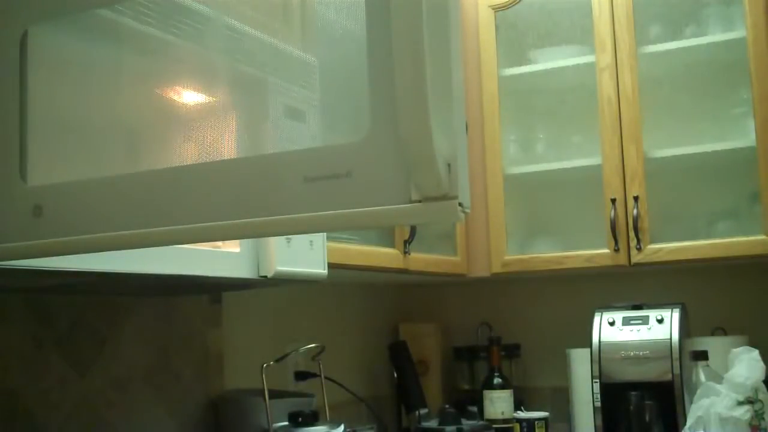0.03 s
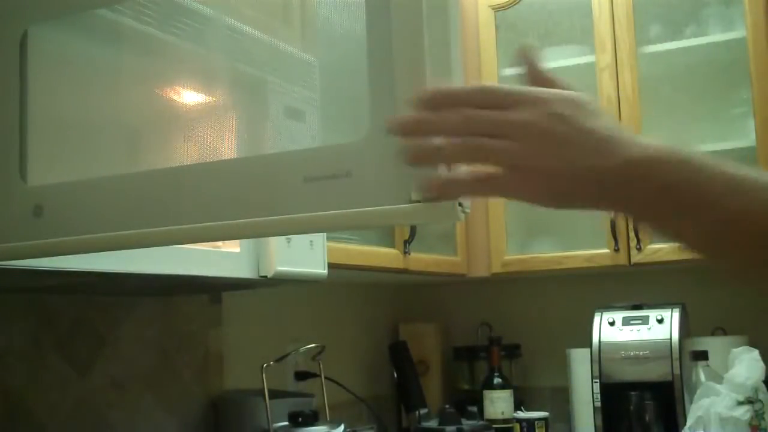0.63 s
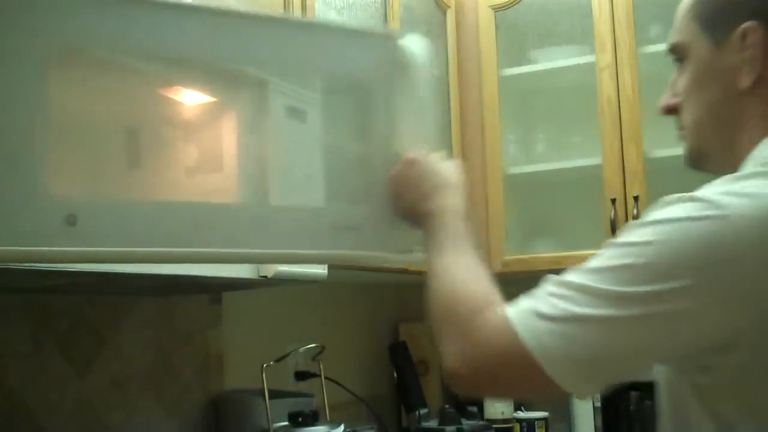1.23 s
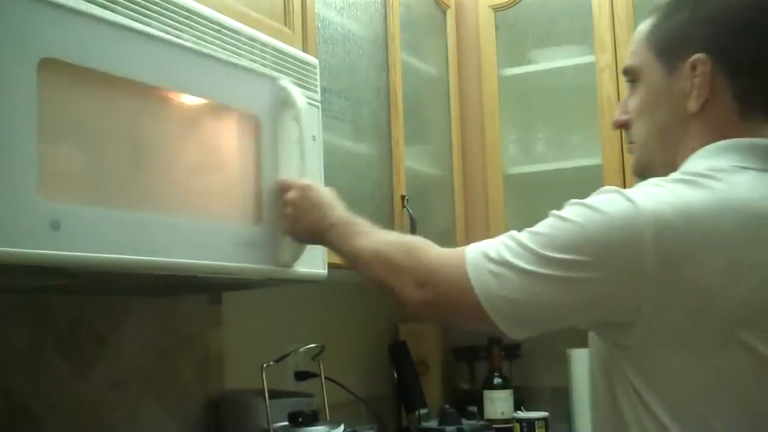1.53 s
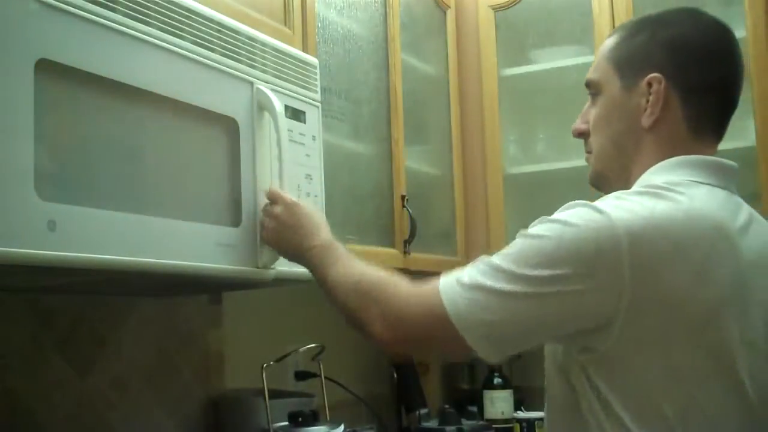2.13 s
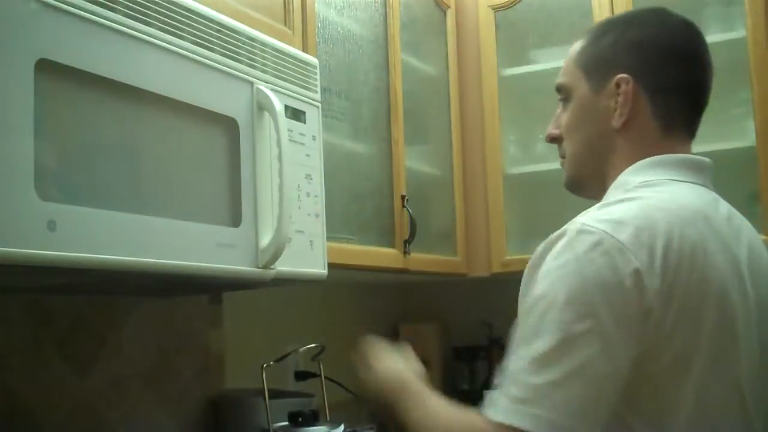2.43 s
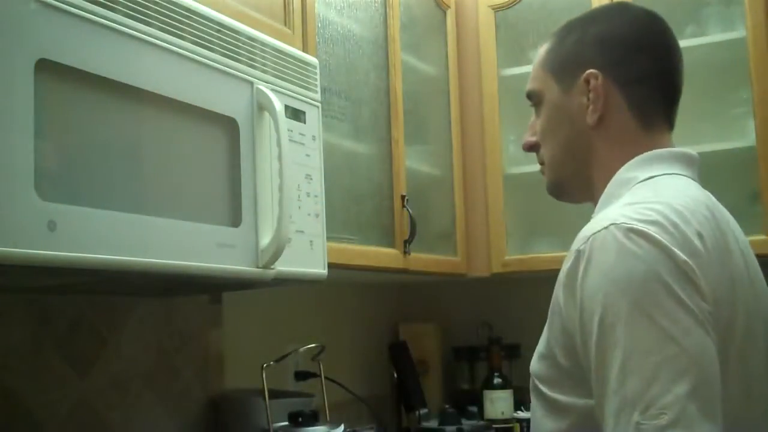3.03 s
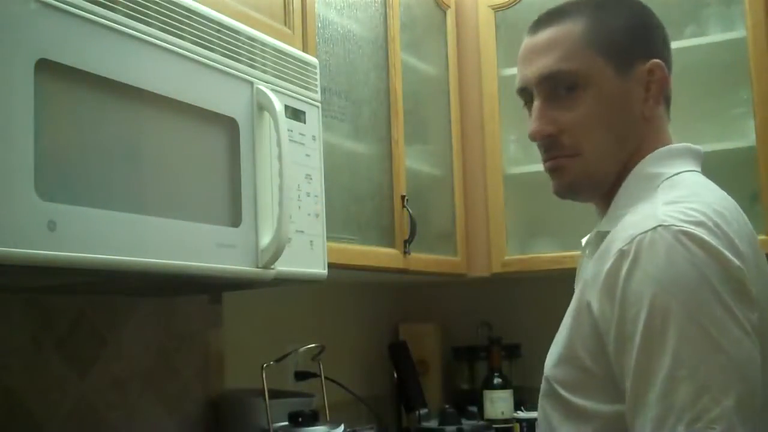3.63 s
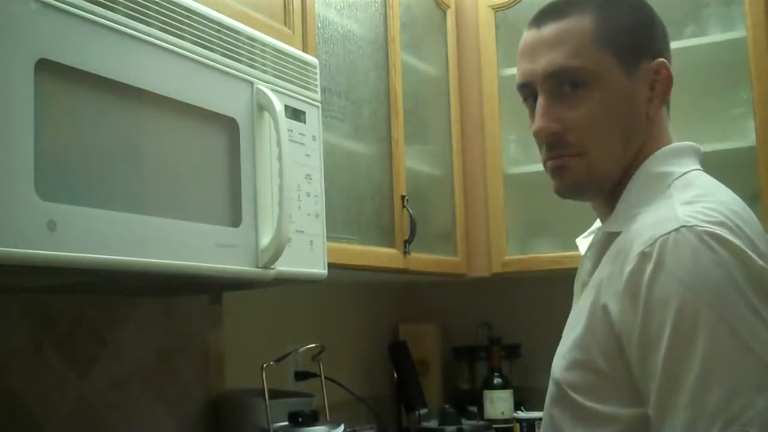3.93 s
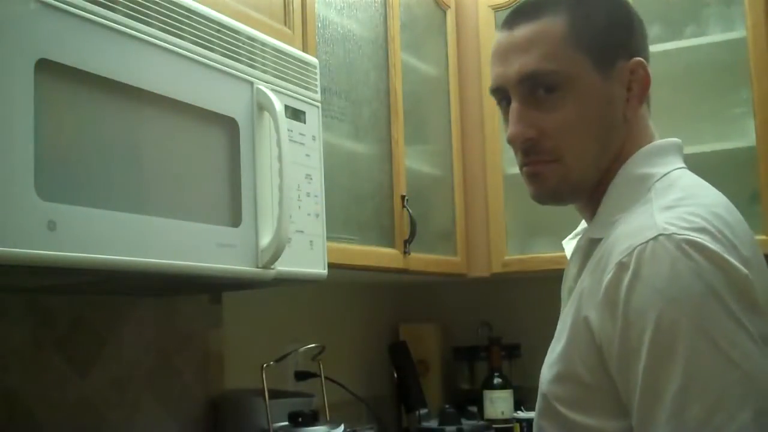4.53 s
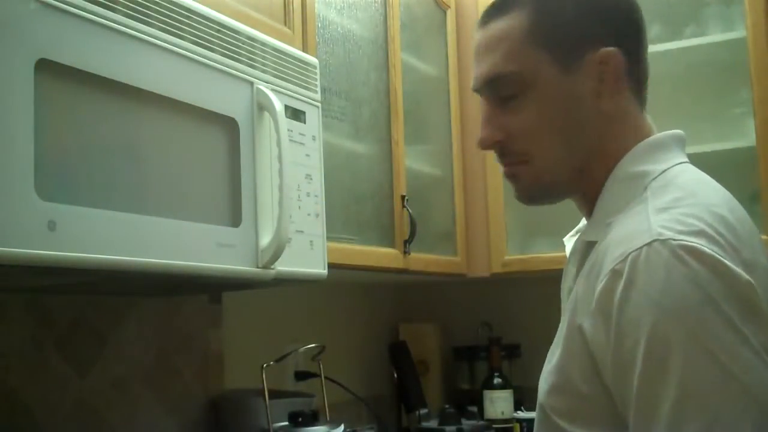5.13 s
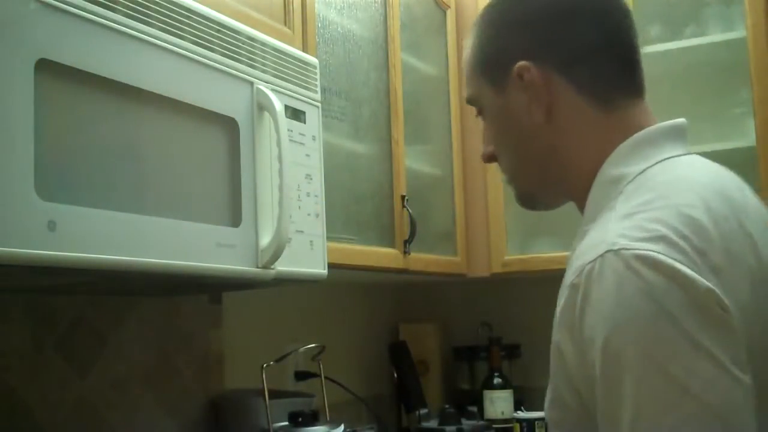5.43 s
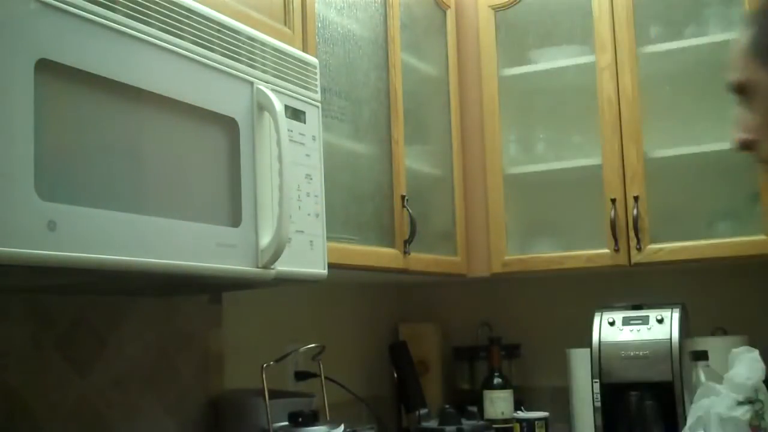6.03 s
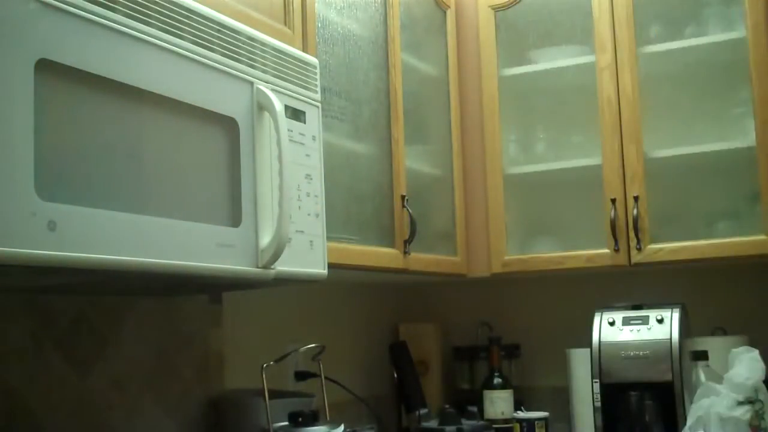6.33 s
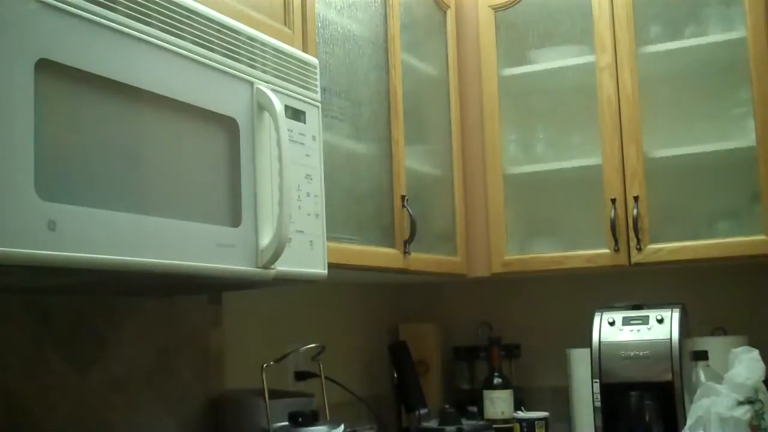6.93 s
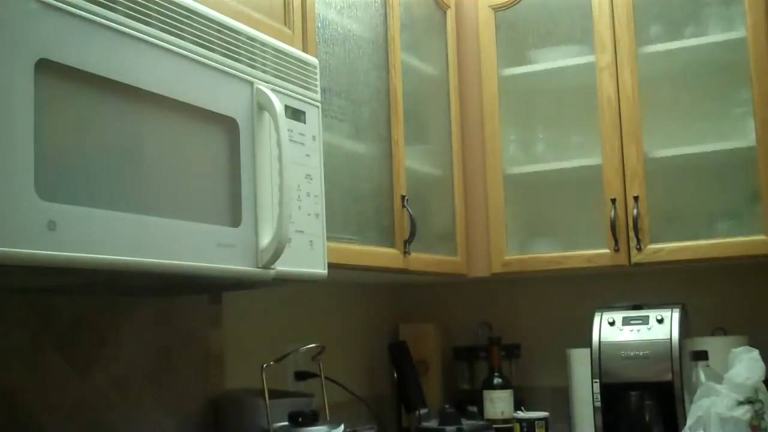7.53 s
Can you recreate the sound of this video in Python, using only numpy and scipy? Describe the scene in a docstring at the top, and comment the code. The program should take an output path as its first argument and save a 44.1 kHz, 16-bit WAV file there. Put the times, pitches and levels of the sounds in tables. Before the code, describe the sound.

Light plastic taps and sleeve swishes lead into a microwave door closing hard near the microphone, its latch snapping in and its steel case thumping. A duller knock on a wooden counter follows, ringing briefly in the small kitchen. Then only soft hiss and a fridge humming slightly to the left remain, until clothes rustle faintly with a barely audible double knock near the end.

```python
"""A small kitchen, heard from inside the room on a small camera with two ringing microphone ports.
A fridge hums to the left throughout. A man's shirt rustles as he takes the handle of a wall microwave
oven and swings the door to. Around 2 s the latch hooks ride up and snap in, and the plastic door slams
on the booming steel case. Just before 3 s something knocks on the wooden counter below. From about 6 s
he turns and walks off, cloth sliding on cloth, with two faint knocks on the way."""
import sys
import numpy as np
from scipy import signal
from scipy.fft import rfft, irfft, next_fast_len
from scipy.io import wavfile

SR = 44100
rng = np.random.default_rng(int(sys.argv[2]) if len(sys.argv) > 2 else 0)


def wav_record(signal):
    """Record a signal, one row per channel, as 16-bit PCM in the file named by sys.argv[1]."""
    frames = np.transpose(np.atleast_2d(signal))
    bounded = np.clip(frames, -1, 1)
    # unit amplitude maps onto the largest positive 16-bit level
    quanta = np.round(bounded * 32767).astype(np.int16)
    wavfile.write(sys.argv[1], SR, quanta)


N = 343539
T = np.arange(N) / SR
RING_T = T[:SR]  # one second for a struck thing to die away

# Room tone, the steady air of the kitchen. Each row: frequency in Hz, relative level in dB.
AIR_SPECTRUM = [(25, -6.5), (70, -7), (150, -5.5), (350, -1), (800, -1.5), (1400, -4), (2400, -6),
                (4000, -11), (7000, -19), (15000, -29)]
# The tones of the fridge. Each row: frequency in Hz, level in dB before panning.
FRIDGE_TONES = [(150.3, -78), (300, -82.5), (360.7, -76.5), (480, -79.5), (812, -81), (1200, -82),
                (1260, -82), (1380, -78), (1680, -84.5), (2160, -83), (2342, -80), (2762, -87.5),
                (4021, -86.5)]
# The man on the move, at the door and then walking off.
# Each row: start in seconds, end in seconds, relative level of the shirt in dB.
SHIRT_STIRS = [(0, 2.24, -60.5), (6.1, 11, -59.5)]
# Strokes of the sleeve as he reaches, swings the door, pushes, lets go and walks off.
# Each row: middle in seconds, length in seconds, relative level in dB, offset for the folds in dB.
SLEEVE_STROKES = [(0.01, 0.1, -54, -9), (0.343, 0.17, -49, -4), (0.54, 0.12, -54.5, -12),
                  (0.844, 0.066, -42.5, -21), (0.94, 0.34, -51, -4.5), (1.215, .21, -49, -13),
                  (1.403, .12, -52, -7), (1.815, 0.045, -55, -21), (2.0, 0.2, -46.5, -1.5),
                  (2.48, 0.09, -52, -18.5), (5.6, .06, -62.5, -12), (6.23, 0.21, -58, -15),
                  (6.442, 0.19, -57, -4.5), (6.892, 0.065, -51, -4.5), (7.067, 0.13, -50.5, -12),
                  (7.46, 0.2, -47.5, -9), (7.573, 0.13, -49, -21), (7.699, 0.068, -55.5, 4.5),
                  (7.785, 0.089, -51.5, 3)]
# Sliding cloth, then rubbing folds. Each row: frequency in Hz, relative level in dB.
SWISH_SPECTRUM = [(600, -33), (2000, 1), (3500, 3), (6000, 3.5), (9000, 2), (15000, -11)]
RUB_SPECTRUM = [(150, -19.5), (400, -9), (750, -4.5), (1500, -4.5), (2500, -4.5), (5000, -17)]
# Light taps of hand, handle and hinge. Each row: start in seconds, crack level in dB,
# tilt in dB per octave, crack t60 (time to fall 60 dB) in seconds, case level in dB.
DOOR_TAPS = [(0.492, -36, 7.5, .02, -85), (0.734, -52, -3.5, .15, -74), (0.9355, -42, 1.5, 0.19, -52.5),
             (1.1405, -41, -4.5, .03, -54), (1.1565, -37, -2.5, .055, -49), (1.6712, -45, 3.5, .05, -83),
             (1.843, -40, -2.5, .15, -46), (1.85, -31.5, -1.5, 0.0901, -50),
             (2.3986, -39, -2.5, 0.067, -69), (2.507, -48, 1, .052, -82)]
# Hard blows: the hooks hit the catch, two hooks snap in, the door meets the case.
# Each row: start in seconds, crack level in dB, tilt in dB per octave, crack t60 in seconds,
# latch level in dB, case level in dB, panel level in dB, rebound lag in seconds, rebound level in dB.
DOOR_BLOWS = [(1.8908, -9.5, 2.5, 0.023, -28, -35.5, -45, 0.0066, -27),
              (2.0143, -10.5, 7, .05, -10.5, -35.5, -48, 0.0056, -22.5),
              (2.0512, -13, 3, .049, -14.5, -49, -41.5, .0053, -23),
              (2.0676, -9.5, 4, .03, -17, -17, -31, .0024, -13.5)]
# Dense ringing of the plastic door. Each row: frequency in Hz, relative level in dB.
PLASTIC_SPECTRUM = [(60, -11.5), (200, -8.5), (400, -2.5), (650, -4), (1050, -2), (1600, 2), (2300, -2),
                    (3300, 3), (5200, 0), (9000, -0.5), (12500, -6), (15000, -14.5)]
# Modes of the sprung latch, the door panel, and the steel case with its cavity.
# Each row: frequency in Hz, relative level in dB, t60 in seconds.
LATCH_MODES = [(3600, -21, 0.019), (4497, -9.5, .016), (5648, -2.5, .018), (6000, -4.5, .016),
               (6294, -3, 0.017), (6590, -6.5, .022), (6860, -7, 0.022), (7970, -9.5, .02),
               (8680, -12.5, .015), (12400, 2.5, 0.012)]
DOOR_PANEL_MODES = [(238, -11, 0.57), (326.2, -9.5, 0.31), (371.7, -1.5, .26), (427, -0.5, .3),
                    (1010, -2, .17), (1070, -1.5, .2), (1440, -3.5, 0.22), (1596, 0.5, 0.17)]
CASE_MODES = [(42.27, -20.5, .5), (73.6, -13.5, .33), (87, -12, 0.44), (110, -7.5, .2), (134.3, 3, 0.22),
              (151, -2, 0.18), (178.3, -16.5, .3)]
# Dull knocks on counter and floor. Each row: start in seconds, clatter level in dB,
# tilt in dB per octave, clatter t60 in seconds, boom level in dB, tick level in dB.
WOOD_KNOCKS = [(2.861, -22.5, -1.2, 0.25, -30, -20.5), (6.883, -52.5, -9, 0.087, -68, -68),
               (6.909, -57.5, -13.5, 0.19, -76, -80)]
# Dense ringing of the wood. Each row: frequency in Hz, relative level in dB.
WOOD_SPECTRUM = [(60, -33), (105, -10), (150, -5), (250, -6.5), (350, -1), (500, -2.5), (630, -4.5),
                 (900, -1), (1300, -8.5), (2000, -8), (3200, -12), (6000, -13), (9000, -21), (15000, -41)]
# Modes of the wooden panels. Each row: frequency in Hz, relative level in dB, t60 in seconds.
WOOD_MODES = [(148, -9, 0.51), (176.6, -2.5, 0.24), (218, -14, 0.42), (301, -21, 0.26), (318, -3.5, 0.36),
              (366.5, -21, 0.4), (435.5, 6.5, 0.12), (508, 0.5, 0.28), (882, -12, .25), (945, -4.5, 0.27),
              (1390, -18, 0.43), (1836, -5.5, 0.25)]
# The kitchen's echo. Each row: band centre in Hz, t60 in seconds, gain in dB.
ECHO_BANDS = [(60, .5, -6), (150, 0.66, -3), (400, 0.72, 1.5), (1000, 0.67, 0.5), (2200, 0.69, -3.5),
              (4030, 0.52, -5), (6760, 0.56, -8.5), (11000, .42, -9.5), (15000, .3, -13)]
# The camera's microphone ports. Each row: frequency in Hz, left gain in dB, right gain in dB.
PORT_RESPONSE = [(59.7, -2, 1.5), (3000, -0.5, 1.5), (4600, 1, 3.5), (5560, 0.5, 7), (6420, 4, 13),
                 (7035, 7, 8), (7800, 12, 1), (8580, 6, -3), (9600, -1, -11.5), (11300, -1.5, -12.5),
                 (13000, -1, -18.5), (15000, -5.5, -31)]


def undb(db):
    """Decibels to gain."""
    return 10 ** (np.asarray(db) / 20)


def unit_rms(x):
    """Scale to rms 1."""
    return x / np.sqrt(np.mean(x ** 2))


def read_curve(hz, table, column=1):
    """Read one column of a table on a log-frequency axis."""
    table = np.array(table)
    return np.interp(np.log(hz + 1e-9), np.log(table[:, 0]), table[:, column])


def colour(x, table, tilt_db=0, column=1):
    """Causal filter with the spectrum of a table, tilted by tilt_db an octave from 200 to 8000 Hz."""
    size = 4096
    hz = np.fft.rfftfreq(size, 1 / SR)
    octaves = np.log2(np.clip(hz, 200, 8000) / 1000)
    gain = undb(read_curve(hz, table, column) + tilt_db * octaves)
    cepstrum = irfft(np.log(gain))
    cepstrum[1:size // 2] *= 2  # fold to minimum phase
    cepstrum[size // 2 + 1:] = 0
    impulse = irfft(np.exp(rfft(cepstrum)))
    return signal.fftconvolve(x, impulse[None], axes=1)[:, :x.shape[1]]


def stereo_noise(size, alike_hz):
    """Noise at two closely spaced microphones: the same in the bass, unrelated well above alike_hz."""
    padded = next_fast_len(size)
    mid, side = rfft(rng.standard_normal((2, padded)))
    alike = 1 / (1 + (np.fft.rfftfreq(padded, 1 / SR) / alike_hz) ** 2)
    mid, side = mid * np.sqrt((1 + alike) / 2), side * np.sqrt((1 - alike) / 2)
    return irfft(np.array([mid + side, mid - side]), padded)[:, :size]


def wander(rate_hz):
    """Random drift with a spread near 1."""
    knots = rng.standard_normal(4096)
    return np.interp(T * rate_hz, np.arange(len(knots)), knots)


def decay(t60, rise_s):
    """Envelope of a struck thing: a quick rise, then an exponential fall."""
    return np.exp(-np.log(1000) * RING_T / t60) * (1 - np.exp(-RING_T / rise_s))


def ring(modes, rise_s, scatter_db):
    """Modes after one blow, neighbours in opposite sign; each blow weights them a little differently."""
    weights = undb(scatter_db * rng.standard_normal(len(modes)))
    return sum((-1) ** k * weights[k] * undb(db) * decay(t60, rise_s) * np.sin(2 * np.pi * hz * RING_T)
               for k, (hz, db, t60) in enumerate(modes))


def burst(spectrum, tilt_db, t60, rise_s, alike_hz):
    """Countless close modes struck at once; rows: left, right, sound sent into the room."""
    envelope = decay(t60, rise_s)
    direct = unit_rms(colour(stereo_noise(SR, alike_hz) * envelope, spectrum, tilt_db))
    # summed over all directions the modes even out into a smooth spectrum
    sent = unit_rms(colour(signal.unit_impulse((1, SR)), spectrum, tilt_db))
    return np.vstack([direct, sent]) * np.sqrt(np.mean(envelope ** 2))


def add(track, start_s, sound):
    """Mix a sound in at start_s."""
    start = int(start_s * SR)
    track[:, start:start + sound.shape[-1]] += sound[..., :N - start]


def room_tone():
    """Soft, steady air all round the microphones."""
    air = unit_rms(colour(stereo_noise(N, alike_hz=895), AIR_SPECTRUM))
    return air * undb(-64 + 0.4 * wander(5))


def fridge():
    """The fridge hums, each tone wavering a little in level and phase."""
    hum = np.zeros(N)
    for hz, db in FRIDGE_TONES:
        amplitude = np.sqrt(2) * undb(db + 0.5 * wander(3.12))
        hum += amplitude * np.sin(2 * np.pi * hz * T + 0.88 * wander(1.9))
    return hum


def cloth_motion(ramp_s=0.9):
    """Gains of (sliding, rubbing): a low stir while the man moves, a bell-shaped swell per stroke."""
    stir = sum(undb(db) * np.clip(np.minimum(T - start, end - T) / ramp_s + 1, 0, 1)
               for start, end, db in SHIRT_STIRS)
    slide_power, fold_power = stir ** 2, (stir * undb(-5.5)) ** 2
    for middle_s, length_s, db, fold_db in SLEEVE_STROKES:
        swell = undb(db) * 0.5 ** ((2 * (T - middle_s) / length_s) ** 2)
        slide_power += swell ** 2
        fold_power += (swell * undb(fold_db)) ** 2
    return np.sqrt(slide_power), np.sqrt(fold_power)


def shirt(swish_db=-5, rub_db=-3):
    """Cloth slides over cloth: fibres catch in tiny grains, and the folds rub at a lower pitch."""
    slide, fold = cloth_motion()
    swish = unit_rms(colour(stereo_noise(N, alike_hz=3000), SWISH_SPECTRUM))
    swish *= undb(wander(450) + 0.69 * wander(35))  # the grains
    rub = unit_rms(colour(stereo_noise(N, alike_hz=2000), RUB_SPECTRUM))
    rub *= undb(1.5 * wander(78))
    return undb(swish_db) * slide * swish + undb(rub_db) * fold * rub


def plastic_crack(db, tilt_db, t60):
    """One contact sets the plastic door's dense modes ringing."""
    return undb(db) * burst(PLASTIC_SPECTRUM, tilt_db, t60, rise_s=0.00027, alike_hz=4500)


def latch(db):
    """The sprung latch rings briefly, damped by its plastic frame."""
    return undb(db) * ring(LATCH_MODES, rise_s=0.0005, scatter_db=3.5)


def oven_boom(case_db, panel_db):
    """The door panel rings at once; the heavy case takes some milliseconds to get going."""
    panel = ring(DOOR_PANEL_MODES, rise_s=0.002, scatter_db=0.5)
    case = ring(CASE_MODES, rise_s=0.018, scatter_db=1.0)
    return undb(panel_db) * panel + undb(case_db) * case


def oven_door():
    """Every contact sounds plastic, latch, panel and case; hard blows rebound. Returns (sharp, boom)."""
    sharp, boom = np.zeros((2, 3, N))
    for start_s, crack_db, tilt_db, t60, latch_db, case_db, panel_db, lag_s, rebound_db in DOOR_BLOWS:
        add(sharp, start_s, plastic_crack(crack_db, tilt_db, t60) + latch(latch_db))
        # a duller, longer rattle that shakes the latch again
        rebound = plastic_crack(rebound_db, tilt_db=-1.4, t60=0.105) + latch(latch_db - 4.5)
        add(sharp, start_s + lag_s, rebound)
        add(boom, start_s, oven_boom(case_db, panel_db))
    for start_s, crack_db, tilt_db, t60, case_db in DOOR_TAPS:
        add(sharp, start_s, plastic_crack(crack_db, tilt_db, t60) + latch(crack_db - 20))
        add(boom, start_s, oven_boom(case_db, panel_db=case_db - 4))
    return sharp, boom


def wood_knocks(contact_s=0.0007):
    """A short tick of contact, then the wooden panels clatter and ring. Returns (sharp, boom)."""
    sharp, boom = np.zeros((2, 3, N))
    for start_s, clatter_db, tilt_db, t60, boom_db, tick_db in WOOD_KNOCKS:
        clatter = burst(WOOD_SPECTRUM, tilt_db, t60, rise_s=contact_s, alike_hz=3426)
        tick = burst(WOOD_SPECTRUM, tilt_db=2.5, t60=0.035, rise_s=contact_s, alike_hz=6030)
        add(sharp, start_s, undb(clatter_db) * clatter + undb(tick_db) * tick)
        add(boom, start_s, undb(boom_db) * ring(WOOD_MODES, rise_s=0.0041, scatter_db=0.5))
    return sharp, boom


def kitchen_echo(sent, build_s=0.007):
    """Diffuse echo off nearby cupboards and walls, each band dying at its own pace."""
    noise = rfft(stereo_noise(SR, alike_hz=2600))
    hz = np.fft.rfftfreq(SR, 1 / SR)
    centres = np.array(ECHO_BANDS)[:, 0]
    tail = 0
    for (_, t60, db), share in zip(ECHO_BANDS, np.eye(len(ECHO_BANDS))):
        band = irfft(noise * read_curve(hz, np.column_stack([centres, share])), SR)
        envelope = decay(t60, build_s)
        tail += undb(db) * band * envelope / np.sqrt(np.sum(envelope ** 2))
    return signal.fftconvolve(sent[None], tail, axes=1)[:, :N]


def scene():
    """What reaches the camera's position; the booms feed the echo less than the cracks do."""
    door_sharp, door_boom = oven_door()
    wood_sharp, wood_boom = wood_knocks()
    cloth = shirt()
    booms = door_boom + wood_boom
    direct = (door_sharp + wood_sharp + booms)[:2] + cloth
    impacts_sent = (door_sharp + undb(-5.5) * wood_sharp + undb(-11.5) * booms)[2]
    echo = kitchen_echo(impacts_sent + undb(-5) * cloth[0])
    background = (room_tone() + fridge()) * undb([[3], [-3]])  # a little to the left
    return direct + echo + background


def record(dry, hiss_db=-62, whine_db=-81, clip_level=0.85, top_hz=14250):
    """Each microphone port rings at its own pitch; the electronics hiss, whine, clip and cut the top."""
    left = colour(dry[:1], PORT_RESPONSE, column=1)
    right = colour(dry[1:], PORT_RESPONSE, column=2)
    whine_hz = np.array([[7870], [11806]])
    whine = np.sqrt(2) * np.sin(2 * np.pi * whine_hz * T + 1.5 * wander(90)).sum(0)
    hiss = rng.standard_normal((2, N))
    heard = np.vstack([left, right]) + undb(hiss_db) * hiss + undb(whine_db) * whine
    lowpass = signal.ellip(10, 0.2, 80, top_hz, fs=SR, output="sos")
    return signal.sosfilt(lowpass, np.clip(heard, -clip_level, clip_level))


dry = scene()
out = record(dry)
wav_record(out)
```